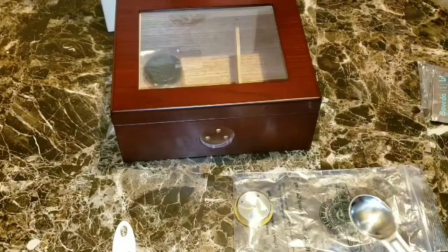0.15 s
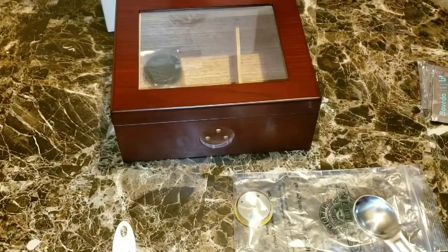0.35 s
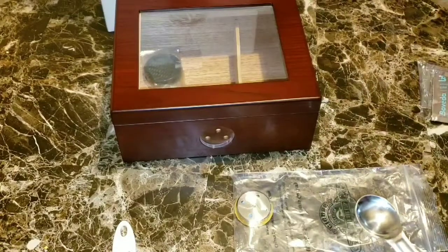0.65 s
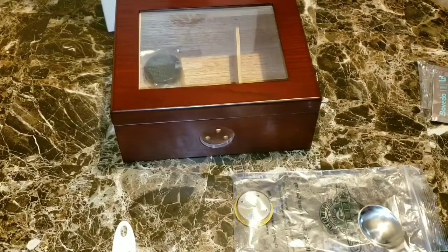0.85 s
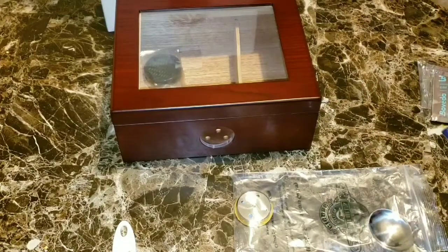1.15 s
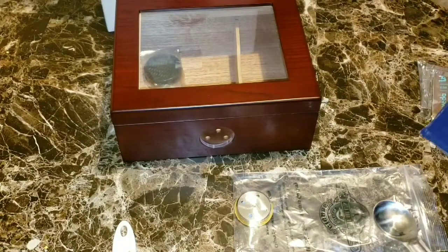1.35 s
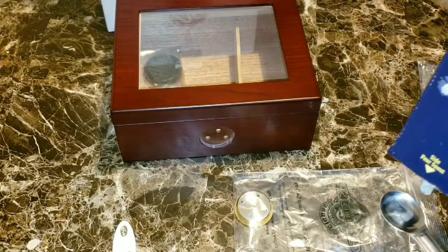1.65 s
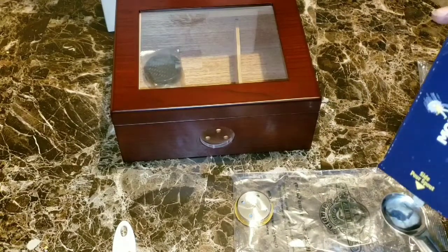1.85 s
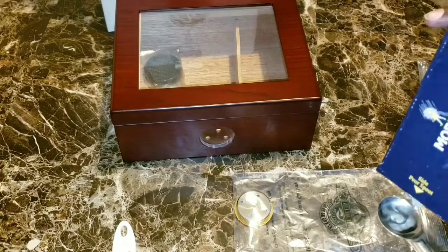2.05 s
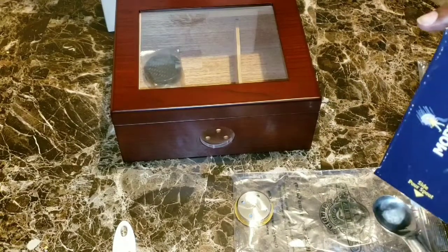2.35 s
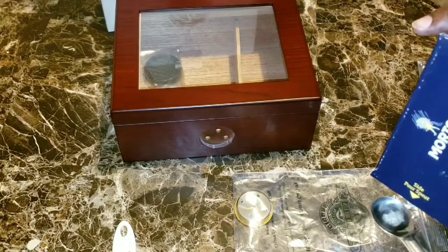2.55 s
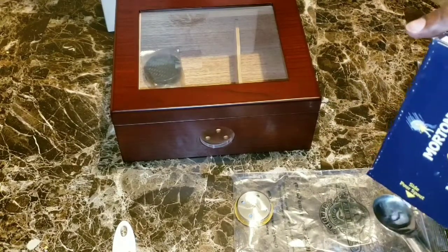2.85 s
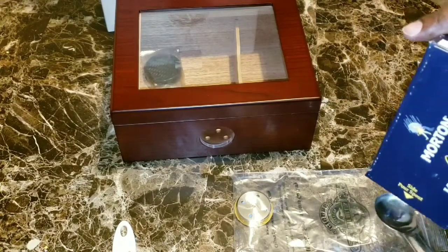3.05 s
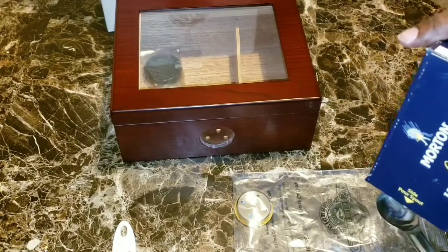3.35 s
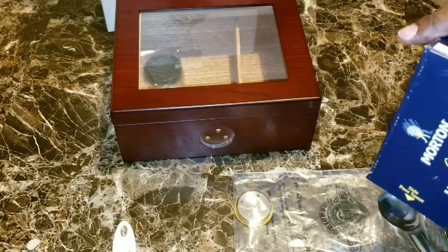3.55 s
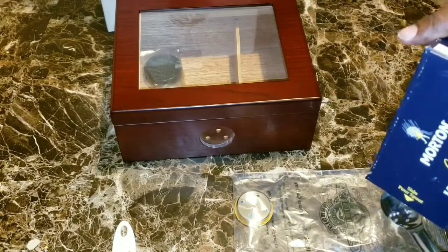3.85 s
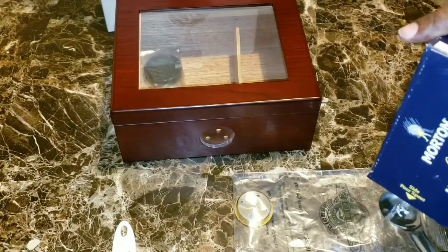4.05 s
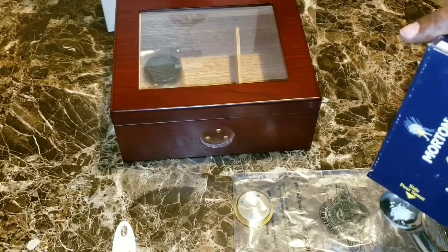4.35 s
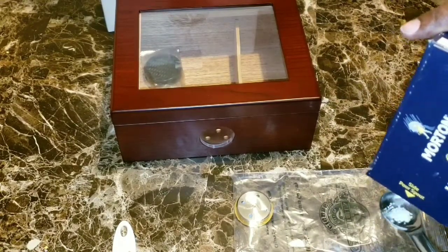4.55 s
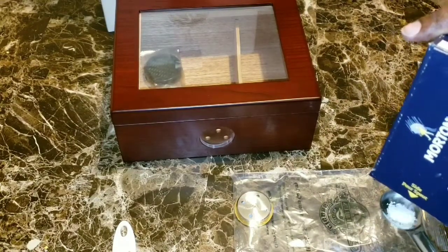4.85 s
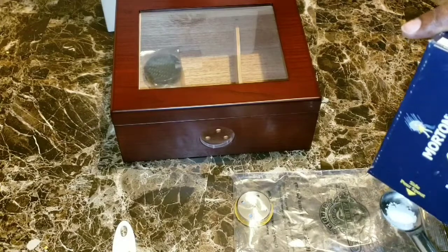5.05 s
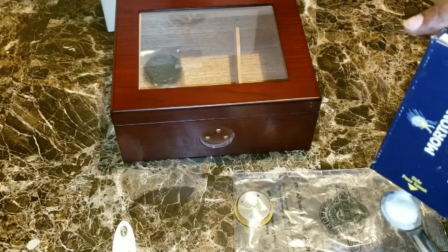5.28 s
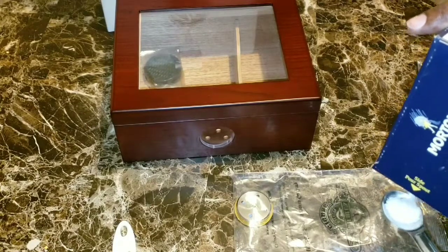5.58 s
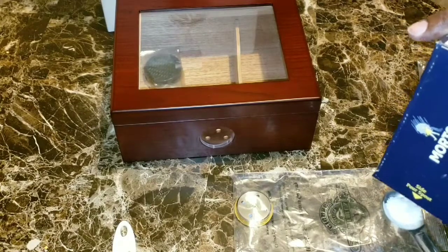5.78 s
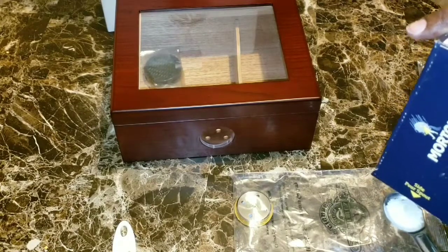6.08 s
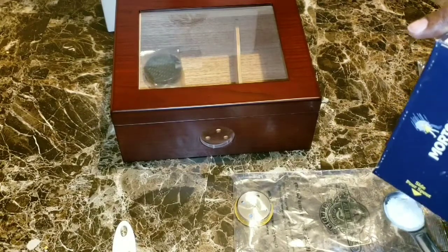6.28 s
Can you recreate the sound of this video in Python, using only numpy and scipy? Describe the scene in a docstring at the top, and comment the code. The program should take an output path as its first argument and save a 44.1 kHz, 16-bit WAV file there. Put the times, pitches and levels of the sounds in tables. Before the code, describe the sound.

A faint fridge hum, low room rumble and microphone hiss run throughout in a quiet kitchen. After a few small taps, a cardboard box knocks on the counter at about 0.7 seconds and again at 1 second. The second knock is the loudest sound; both ring briefly in the room, with light ticks from a metal spoon. Around 1.7 seconds coarse salt slides inside the box in a grainy, slightly hollow swish, followed by a softer one from 2.4 to 2.9 seconds. Faint bumps come at 2.2 and 2.9 seconds. From 3 seconds the box is shaken gently five or six times a second, each shake giving a small swish and a thin, bright spurt of crystals ticking into the spoon. The trickle is strongest around 4 seconds and continues softly until the end, at about 6.4 seconds.

```python
"""Coarse salt slides in swishes inside a cardboard box and trickles in small shakes onto a metal spoon.
Friction of many crystals makes the swish, and the air in the box resonates on a hollow note;
separate impacts make the trickle. Before the pour the box is lifted and knocks twice, ringing the
modes of the kitchen counter, and hard contacts tick on the spoon. A fridge hums over room rumble
and microphone hiss."""
import sys
import numpy as np
from scipy import signal
from scipy.fft import rfft, irfft
from scipy.io import wavfile
from scipy.ndimage import uniform_filter1d

SR = 44100
rng = np.random.default_rng(int(sys.argv[2]) if len(sys.argv) > 2 else 0)


def wav_out(sig):
    """Save sig, one row per channel (or a flat mono array), as 16-bit PCM at SR to the path in sys.argv[1]."""
    wavfile.write(sys.argv[1], SR, np.round(np.clip(np.atleast_2d(sig).T, -1, 1) * 32767).astype(np.int16))


N = 283077
T = np.arange(N) / SR

# salt sliding as the box is lifted, tipped twice and held slanted: time_s, relative_db
SLIDE_LEVELS = [(0.4, -92), (0.47, -75.5), (0.62, -81.5), (0.77, -70.5), (0.93, -69.5), (1.12, -78.5),
                (1.28, -74.5), (1.43, -79.5), (1.48, -71), (1.55, -65.5), (1.66, -49), (1.76, -48),
                (1.89, -60.5), (2.09, -69), (2.38, -69.5), (2.46, -59), (2.53, -59.5), (2.63, -54.5),
                (2.72, -56.5), (2.8, -62.5), (2.9, -63.5), (3.04, -72.5), (3.09, -78.5), (3.65, -67),
                (4.4, -76.5), (5.75, -89), (6.42, -77.5)]
# the hand shakes the box five or six times a second: middle_s, length_s, slide_relative_db, fall_db
SHAKES = [(3.005, 0.044, -75, -74), (3.203, .04, -73.5, -79), (3.337, 0.059, -68, -79),
          (3.495, .06, -68, -67), (3.6, .06, -73, -70), (3.695, .07, -69.5, -62), (3.8, .05, -85, -64),
          (3.88, 0.036, -72, -56), (4.032, 0.084, -66.5, -57), (4.185, 0.078, -64, -59),
          (4.356, .07, -71.5, -66.5), (4.545, .04, -82, -65.5), (4.73, 0.096, -73.5, -65.5),
          (4.893, 0.04, -69.5, -63), (5.085, 0.064, -75, -66), (5.275, 0.07, -67, -59.5),
          (5.435, 0.071, -70, -65), (5.5, .04, -70.5, -66), (5.61, 0.078, -79, -66), (5.825, .06, -77, -67),
          (6.006, .06, -71.5, -64.5), (6.165, .04, -93, -73), (6.335, .07, -82, -64.5)]


def sliding_salt():
    """Granular friction: crystals rub the cardboard; small slips brighten one band, then another."""
    # spectrum of the rubbing: frequency_hz, gain_db
    spectrum = [(240, -45), (400, -5), (560, -2), (1270, -11.5), (2180, -9.5), (3130, -6.5), (10700, -7.5),
                (14000, -8)]
    # resonances of the box walls: centre_hz, width_hz, gain_db
    walls = [(4470, 1300, -11.5), (7420, 620, -5)]
    # the salt jumps when the box is knocked: middle_s, relative_db
    jumps = [(.683, -54), (.985, -57)]
    rub = colour(collisions(per_s=9000, spread_db=1.5, smear_ms=0.81), spectrum)
    rub = rub + sum(undb(db) * resonance(rub, hz, width) for hz, width, db in walls)
    slips = sum(wander(30) * resonance(rub, hz, hz / 5) for hz in 700 * 2 ** np.arange(0, 4.4, 1 / 3))
    jolts = [swell(s, db, rise_s=0.022, fade_s=0.043) for s, db in jumps]
    swishes = [swell(s, db, rise_s=0.029, fade_s=0.045, hold_s=hold) for s, hold, db, _ in SHAKES]
    return at_rms(rub + 0.17 * slips, db=5) * power_sum([envelope(SLIDE_LEVELS)] + jolts + swishes)


def box_cavity(pitch_hz=1625, cutoff_hz=107):
    """Cavity resonance: air in the box rings on a hollow note, louder the harder the salt slides."""
    # the note also swells alone: middle_s, length_s, level_db, pitch_hz
    swells = [(0.43, .12, -76.5, 1480), (.69, .04, -78, 1740), (.86, .06, -76, 1610),
              (1.002, .04, -74, 1610), (1.278, .06, -81, 1610), (2.72, .05, -71, 1760),
              (3.07, .07, -76, 1730), (3.318, 0.081, -69, 1723), (3.5, .1, -79.5, 1710),
              (3.997, 0.09, -76, 1630), (4.74, 0.11, -75, 1740), (4.987, 0.3, -81, 1675),
              (5.386, 0.23, -78, 1630)]
    noise = rng.standard_normal((2, N)) + 1j * rng.standard_normal((2, N))
    modulation = signal.lfilter(*signal.butter(2, cutoff_hz, fs=SR), noise)

    def note(hz):
        return at_rms((np.exp(2j * np.pi * hz * T) * modulation).real, db=0)

    drive = envelope(SLIDE_LEVELS) / undb(-49)
    driven = undb(-60.5) * drive ** 1.26 * note(pitch_hz)  # gains 1.26 dB per dB of sliding
    return driven + sum(swell(s, db, rise_s=0.039, fade_s=0.069, hold_s=hold) * note(hz)
                        for s, hold, db, hz in swells)


def falling_salt(crystals_per_s=9, crystal_decay_s=0.0033):
    """Impact noise: a thin, bright stream ticks into the spoon, and large crystals stand out."""
    # grains that fall between the shakes: time_s, level_db
    dribble = [(3.3, -93), (3.5, -74), (4.2, -72), (6.42, -71.5)]
    # spectrum of the stream: frequency_hz, gain_db
    spectrum = [(1500, -16), (4000, -22.5), (7500, -9), (9500, -10), (11500, -1), (13800, -2.5)]
    spurts = [swell(s, db, rise_s=0.028, fade_s=0.034, hold_s=hold) for s, hold, _, db in SHAKES]
    flow = power_sum([envelope(dribble)] + spurts)
    stream = at_rms(colour(collisions(per_s=2700, spread_db=1.5, smear_ms=0.98), spectrum), db=1)
    chance, size = rng.random(N), rng.standard_normal(N)
    strikes = (chance < crystals_per_s / SR) * undb(3.5 + 3.5 * size)
    decays = signal.lfilter([1], [1, -np.exp(-1 / (crystal_decay_s * SR))], strikes)
    treble = signal.lfilter(*signal.butter(2, 3500, "high", fs=SR), rng.standard_normal((2, N)))
    return flow * (stream + decays * treble)


def box_knocks(room_t60_s=0.78, room_onset_s=0.0026, room_db=-1):
    """Acceleration noise: a push moves the air; a sharper pulse excites the counter and the room."""
    # knocks on the counter: middle_s, peak_db, push_ms, direction, ringing_share_db
    knocks = [(0.451, -50, 11, 1, -20), (0.528, -48, 3.3, 1, -4), (0.6753, -30.5, 1.49, 1, -5),
              (0.6817, -40.5, 0.83, 1, -4), (.885, -54.5, 5, 1, 4), (0.974, -19.5, 0.95, -1, -3),
              (0.9795, -25.5, 1.03, -1, -6.5), (2.218, -49.5, .8, 1, 3.5), (2.897, -49, 0.57, 1, 3)]
    # modes of the counter: pitch_hz, relative_db, t60_s
    modes = [(118, 1.5, 0.14), (168.4, 0, 0.28), (206, 3, 0.11), (259.4, -5.5, 0.41), (330, -3, 0.25),
             (457, -36, .1), (543, -6, 0.27), (635, -15, 0.73), (910, -5, .15)]
    direct, excitation = np.zeros(N), np.zeros(N)
    for s, db, push_ms, direction, ring_db in knocks:
        push_s = push_ms / 1000
        direct += direction * undb(db) * push_pulse(s, push_s)
        excitation += direction * undb(db + ring_db) * push_pulse(s, 0.75 * push_s)
    t = T[:SR // 2]
    counter = sum(undb(db) * np.cos(2 * np.pi * hz * t) * 1000 ** (-t / t60) for hz, db, t60 in modes)
    ringing = undb(-46) * signal.fftconvolve(excitation, counter)[:N]
    build_up = np.clip(t / room_onset_s, 0, 1) ** 2
    reverb = diffuse_noise(alike_below_hz=280)[:, :len(t)] * 1000 ** (-t / room_t60_s) * build_up
    reverb /= np.sqrt(np.mean(np.sum(reverb ** 2, axis=1)))  # unit energy
    return direct + ringing + undb(room_db) * signal.fftconvolve(excitation[None], reverb)[:, :N]


def spoon_ticks(pivot_hz=5000):
    """Impact excitation: contacts rattle the spoon's resonances; harder ones favour the higher."""
    # resonances of the spoon: centre_hz, width_hz, relative_db
    modes = [(3740, 280, 0), (4480, 300, -0.5), (6040, 970, 2), (7860, 590, -1), (12600, 2400, -6)]
    # hard contacts: start_s, relative_db, t60_s, hardness_db_per_octave
    contacts = [(.257, -72.5, 0.087, -17), (.325, -75, .08, -6), (.459, -69, 0.46, -10),
                (.467, -77, .06, -6), (0.56, -65, .04, -6), (0.644, -51.5, 0.099, 5),
                (.8335, -52, .015, -1), (0.9728, -48, 0.037, 9)]
    noise = rng.standard_normal((2, N))
    ticks = 0
    for hz, width, mode_db in modes:
        octaves = np.log2(hz / pivot_hz)
        decays = sum(undb(db + hardness * octaves) * (T >= s) * 1000 ** (-np.abs(T - s) / t60)
                     for s, db, t60, hardness in contacts)
        ring = resonance(resonance(noise, hz, width), hz, width)
        ticks += decays * at_rms(ring, mode_db - 10)
    return ticks


def fridge_hum():
    """Frequency and amplitude modulation: the fridge's low tones waver in pitch and level."""
    # fridge tones: pitch_hz, waver_hz, level_db
    tones = [(119.1, 3.09, -64), (240.2, 4.82, -74), (350, 8.02, -72.5), (419.6, 8.29, -74.5)]
    hum = 0
    for hz, waver_hz, db in tones:
        phase = 2 * np.pi * np.cumsum(hz + waver_hz * wander(12)) / SR
        lead = 0.19 * wander(7.4) * np.array([[1], [-1]])  # standing waves drift between left and right
        hum += at_rms(np.sin(phase + lead) * undb(2.15 * wander(11)), db)
    return hum


def room_rumble():
    """Diffuse low noise fills the room and swells independently in half-octave steps of frequency."""
    # spectrum of the rumble: frequency_hz, gain_db
    spectrum = [(15, -54), (25, -10), (70, -5), (123, -2.5), (167, -4), (280, -11.5), (356, -6.5),
                (537, -18), (913, -31.5), (1500, -36.5), (1950, -36), (3300, -120)]
    air = colour(diffuse_noise(alike_below_hz=620), spectrum)
    centres_hz = 30 * 2 ** np.arange(0, 6, 0.5)
    rumble = sum(undb(2 * wander(4.8)) * resonance(air, hz, hz / 2) for hz in centres_hz)
    return at_rms(rumble, db=-62.5)


def microphone_hiss():
    """Self-noise: a steady hiss, uncorrelated between the channels."""
    # spectrum of the hiss: frequency_hz, gain_db
    spectrum = [(500, 3), (1000, -4.5), (3000, -4.5), (8000, -7.5), (15000, -9.5)]
    return at_rms(colour(rng.standard_normal((2, N)), [(100, -19)] + spectrum), db=-74.5)


def collisions(per_s, spread_db, smear_ms):
    """Shot noise: random impacts of uneven size, each a short burst in both channels."""
    chance, size = rng.random(N), rng.exponential(size=N)
    energy = (chance < per_s / SR) * undb(2 * spread_db * size)
    tail = np.exp(-np.arange(400) / (smear_ms * SR / 1000))
    power = np.abs(signal.fftconvolve(energy, tail)[:N])
    return np.sqrt(power) * rng.standard_normal((2, N))


def push_pulse(middle_s, width_s):
    """Radiated pressure follows the acceleration of a bell-shaped push."""
    u = (T - middle_s) / width_s
    return (1 - u ** 2) * np.exp(-u ** 2 / 2)


def diffuse_noise(alike_below_hz, apart=0.062):
    """Spatial coherence: left and right are nearly alike in the bass and unrelated in the treble."""
    mid, side = rng.standard_normal((2, N))
    high_side = signal.lfilter(*signal.butter(1, alike_below_hz, "high", fs=SR), side)
    side = apart * side + (1 - apart) * high_side
    return np.array([mid + side, mid - side])


def resonance(x, hz, width_hz):
    """A damped resonator with gain 1 at its centre."""
    return signal.lfilter(*signal.iirpeak(hz, hz / width_hz, SR), x)


def colour(x, spectrum):
    """Spectral shaping by gains interpolated over log frequency."""
    hz, db = np.transpose(spectrum)
    bins_hz = np.fft.rfftfreq(x.shape[-1], 1 / SR) + 1
    gain = undb(np.interp(np.log(bins_hz), np.log(hz), db))
    return irfft(rfft(x) * gain, x.shape[-1])


def wander(per_s):
    """Slow random modulation: steps smoothed twice, with unit standard deviation."""
    hold = int(SR / per_s)
    steps = np.repeat(rng.standard_normal(N // hold + 1), hold)
    smooth = uniform_filter1d(uniform_filter1d(steps, hold), hold)[:N]
    return smooth / smooth.std()


def swell(middle_s, db, rise_s, fade_s, hold_s=0):
    """Exponential growth and decay: up 10 dB per rise_s, a hold, then down 10 dB per fade_s."""
    t = np.clip(T - middle_s, -1, 1)
    return undb(db) / np.sqrt(1 + 10 ** (-(t + hold_s / 2) / rise_s) + 10 ** ((t - hold_s / 2) / fade_s))


def envelope(points):
    """Gain interpolated in decibels; silent before the first point, held after the last."""
    time_s, db = np.transpose(points)
    return undb(np.interp(T, time_s, db, left=-200))


def power_sum(gains):
    """Incoherent sources add in power."""
    return np.sqrt(sum(gain ** 2 for gain in gains))


def at_rms(x, db):
    return x * undb(db) / np.sqrt(np.mean(x ** 2))


def undb(db):
    return 10 ** (np.asarray(db) / 20)


def scene():
    """Superposition: salt and spoon, slightly to the left, add to the knocks and the background."""
    pour = sliding_salt() + box_cavity() + falling_salt() + spoon_ticks()
    return pour * undb([[0.4], [-0.4]]) + box_knocks() + fridge_hum() + room_rumble() + microphone_hiss()


def record(dry, cutoff_hz=14560):
    """Band limiting: a steep elliptic low-pass removes the highest treble."""
    return signal.sosfilt(signal.ellip(12, 0.2, 60, cutoff_hz, fs=SR, output="sos"), dry)


dry = scene()
out = record(dry)
wav_out(out)
```